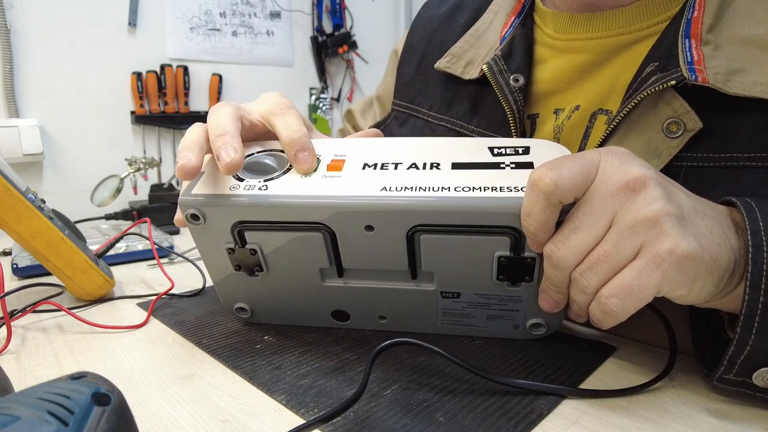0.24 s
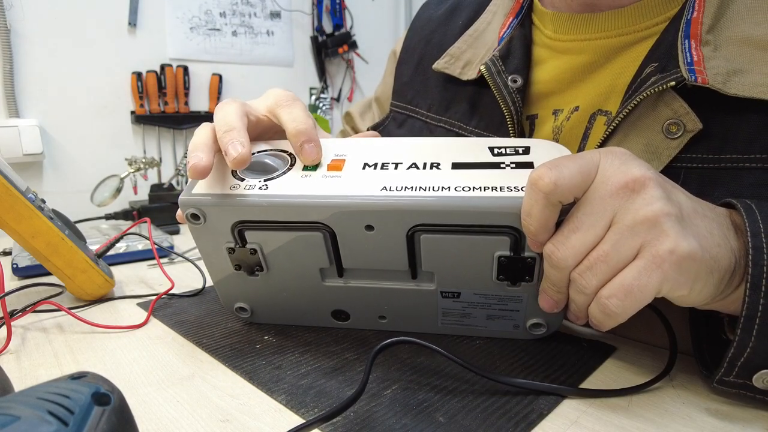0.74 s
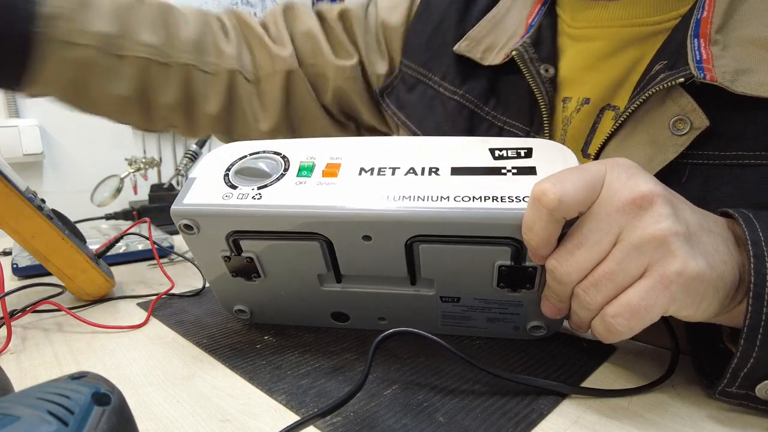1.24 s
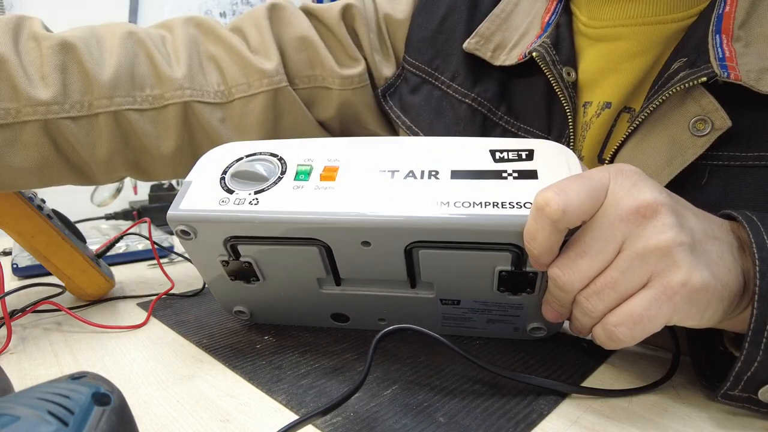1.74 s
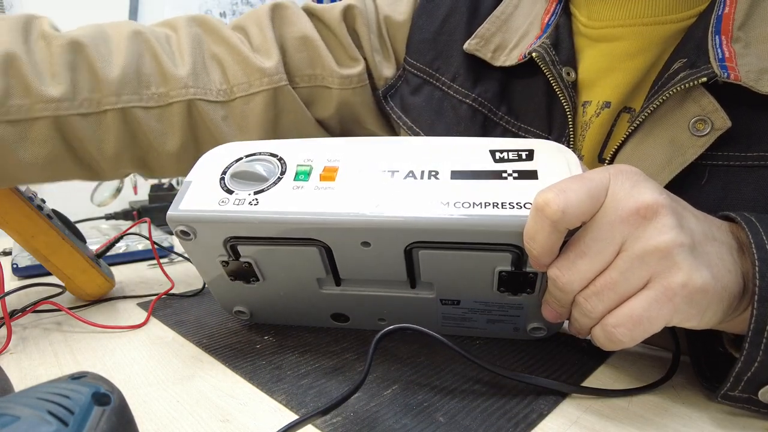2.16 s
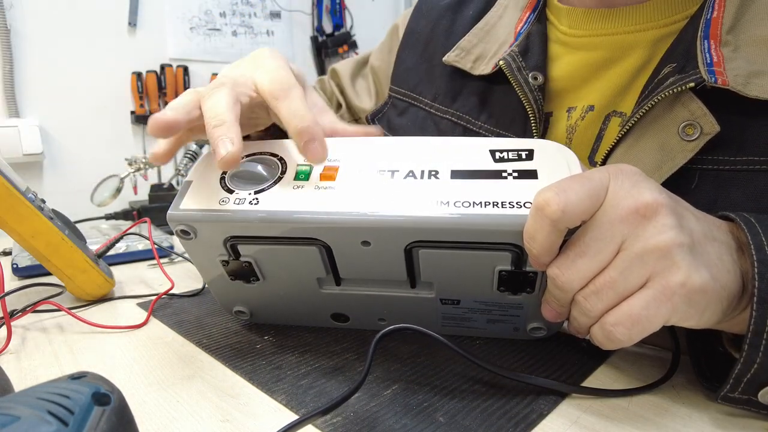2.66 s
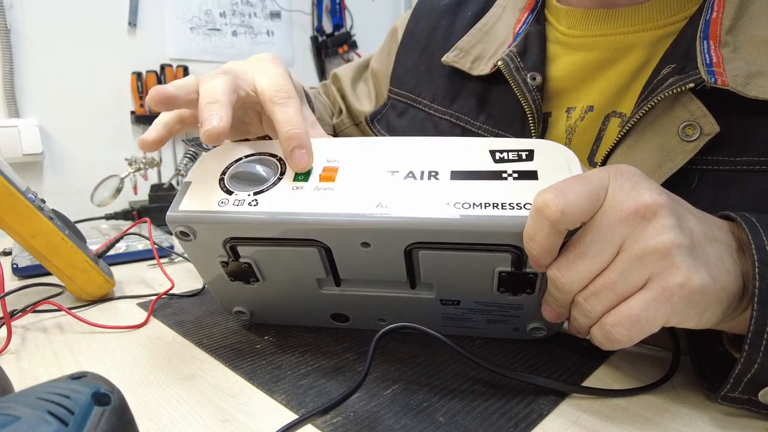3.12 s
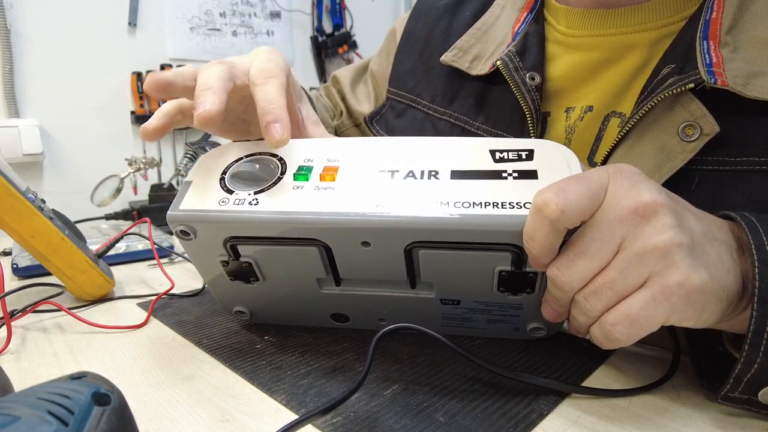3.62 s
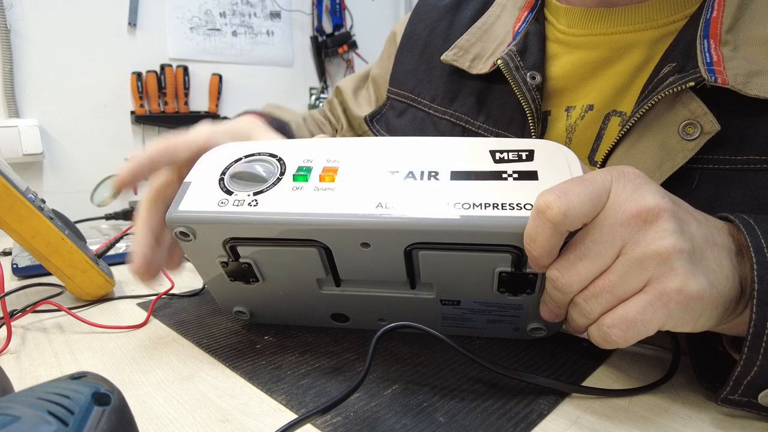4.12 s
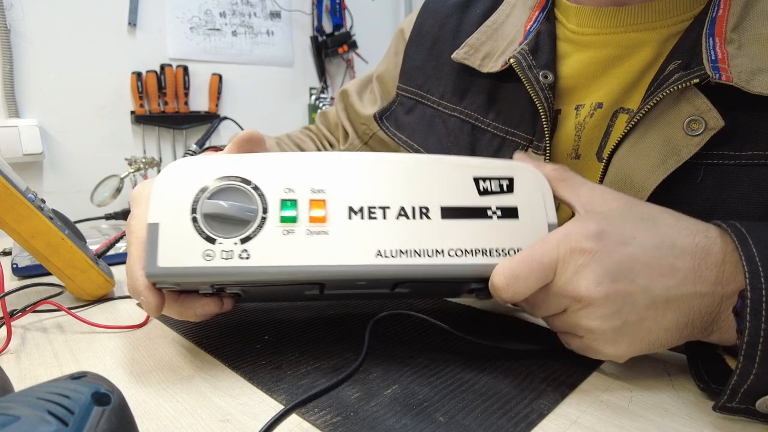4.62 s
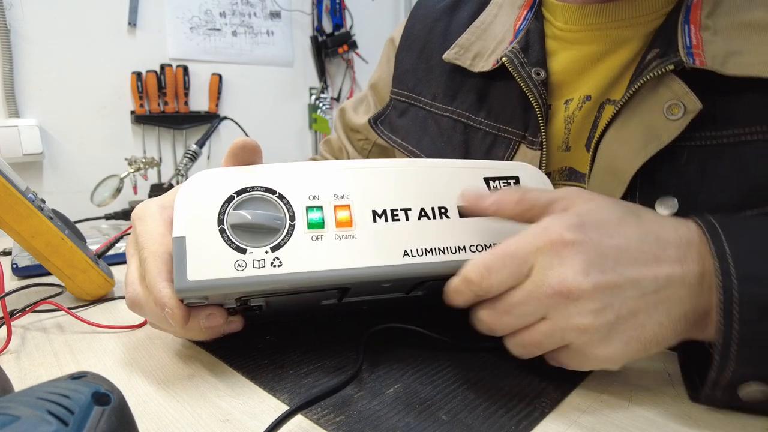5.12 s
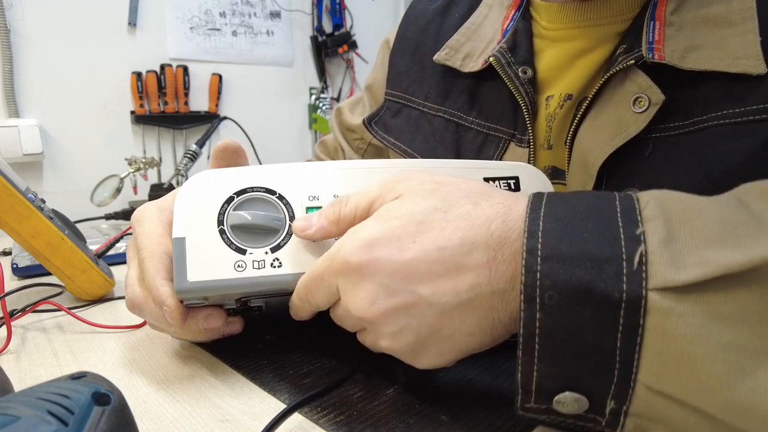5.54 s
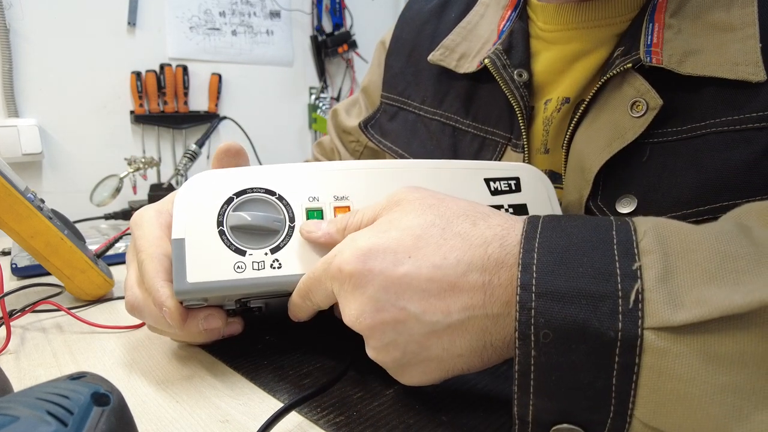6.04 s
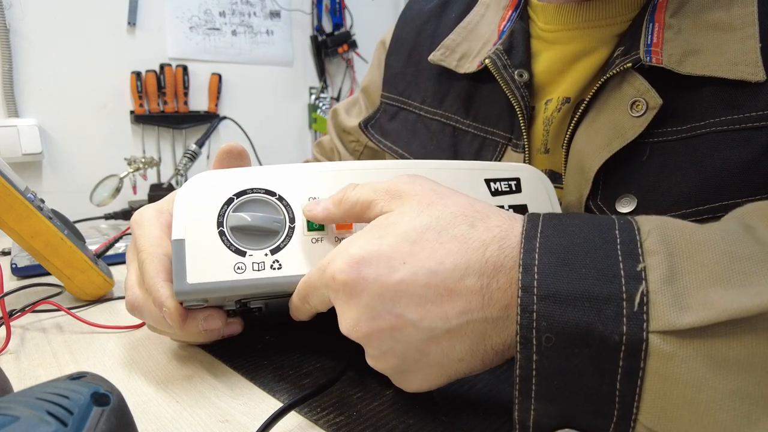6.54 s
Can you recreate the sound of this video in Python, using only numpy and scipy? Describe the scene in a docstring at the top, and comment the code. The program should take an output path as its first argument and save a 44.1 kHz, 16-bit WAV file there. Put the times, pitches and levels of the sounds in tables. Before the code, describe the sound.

In a small, fairly dry workshop, hands click and brush around a pump over a soft rumble. After about three seconds a switch starts a steady fast mains buzz with bright air hiss. Turning the case shifts the hiss and resonance; a thud lands on the bench. A sharp snap silences it, leaving a thin fading seep, then another snap restarts it. Close microphones.

```python
"""Diaphragm air pump on a workbench

A small mains-driven pump in a hard case, close to two capsules: harmonics of the mains make the hum,
and one gust of noise a cycle drives the resonances of valve, outlet and shell.
Hands click and rustle (shaped noise) in a droning workshop; the rocker snaps on, the pump is tipped
towards the microphone and set down, is switched off and on again; the bench knocks and wobbles (decaying sines).
"""
import sys
import numpy as np
from scipy import signal
from scipy.fft import rfft, irfft
from scipy.io import wavfile
from scipy.ndimage import uniform_filter1d

SR = 44100
rng = np.random.default_rng(int(sys.argv[2]) if len(sys.argv) > 2 else 0)


def put_to_file(sound):
    """Save the sound as 16-bit audio at rate SR, in the file named by the first command-line argument."""
    columns = np.atleast_2d(sound).T  # one column per channel
    safe = np.clip(columns, -1, 1)
    whole_steps = np.round(safe * 32767)
    wavfile.write(sys.argv[1], SR, whole_steps.astype(np.int16))


N = 298998

# Pump running. Each row: on in seconds, off in seconds.
RUNS_S = [(3.3, 6.06), (6.68, 7.0)]
# Magnet hum. Each row: multiple of mains, level in dB.
HUM = [(1, -40), (2, -48.5), (3, -40), (4, -65), (5, -57), (6, -68)]
# Air hiss, base or front towards the microphone. Each row: frequency in Hz, relative density in dB.
HISS_BASE = [(210, -43), (350, -7), (411, -17), (577, -31), (625, -5.5), (1330, -9.5), (1590, -20),
             (3400, -8), (3990, -11.5), (5170, -15), (6370, -2), (7370, -5), (11800, -10.5), (15200, -10.5),
             (16500, -45)]
HISS_FRONT = [(210, -51), (350, -21), (453, -15), (568, -20), (850, -9), (1310, -7.5), (1700, -3),
              (2460, -36), (3630, -23), (4120, -7.5), (4470, -10.5), (7860, -6.5), (11600, -24),
              (15200, -15.5), (16500, -52)]
# Resonances of outlet, valve and shell. Each row: frequency in Hz, width in Hz, relative level in dB.
OUTLET = [(1696, 210, 3), (1808, 204, -2.5), (1980, 110, -8), (1556, 180, -3.5), (1370, 150, -11)]
VALVE_BASE = [(5620, 220, -3), (6190, 300, 0), (6470, 300, -2), (6850, 400, -6), (7930, 300, -6),
              (8560, 250, -10)]
VALVE_FRONT = [(5600, 400, -6), (6350, 400, -1), (6800, 350, -5), (7270, 300, -3), (7750, 300, 0),
               (8000, 250, -1), (8600, 250, -6)]
SHELL_BASE = [(1510, 680, -5.5), (2060, 220, -3), (2630, 170, 0.5), (3480, 390, -6), (4000, 280, -1),
              (4720, 340, -2.5)]
SHELL_EDGE = [(2320, 310, -9.5), (3720, 130, -1), (4000, 650, 0), (4830, 180, -10.5), (7950, 450, 2),
              (8920, 480, -1.5)]
SHELL_FRONT = [(845, 200, 0.5), (1252, 63, 3.5), (2690, 240, -1), (3230, 170, 2), (3440, 470, -2.5),
               (4300, 290, -14), (4910, 170, -1)]
# Tipping of the case. Each row: time in seconds, tilt in degrees (0 base-on, 90 front-on).
TILT = [(3.3, 15.7), (4.2, 10.4), (4.32, 18), (4.46, 27.6), (4.6, 62.3), (4.8, 64.2), (4.95, 66),
        (5.7, 66.4), (5.95, 110), (6.78, 90)]
# What arrives at each tilt. Each row: tilt in degrees, then shell, outlet, valve and hiss,
# all in dB before the run-time and side gains.
FACING = [(13.7, -47, -55, -40, -52.5), (23.9, -42, -41.5, -51.5, -56.5), (44.7, -43, -44, -60, -54.5),
          (61.9, -39, -45, -57, -56), (65.8, -43.5, -40.5, -42, -49.5), (90, -51.5, -40, -42, -48.5)]
# Gap between case and bench, sings higher as it closes: start in seconds, length in seconds,
# from Hz, to Hz, level in dB.
GAP = (4.5, .8, 2650, 3300, -50.5)
# Handling clicks and rocker snaps. Each row: start in seconds, level in dB, loudest at Hz,
# fall either side in dB per octave, t60 in seconds of a band from 1500 Hz, tick in dB re the burst.
CLICKS = [(0.175, -51, 5500, 9, 0.05, -12), (0.185, -31, 1800, 3.5, 0.077, -16),
          (1.316, -24.5, 1880, 14, 0.043, -9), (1.595, -33.5, 690, 6, 0.13, -22),
          (1.604, -51, 2000, 2.5, 0.081, -20), (1.721, -52, 13000, 12, 0.055, -25),
          (1.743, -49.5, 4000, 8, 0.04, -20), (1.808, -45, 1250, 10, 0.04, -18),
          (1.941, -30.5, 1630, 10.5, 0.068, -19), (1.9965, -27.5, 12900, 10, 0.047, -30),
          (1.9975, -24, 2480, 11, 0.058, -28), (2.039, -27, 1080, 9, 0.06, -20),
          (2.118, -52, 5000, 8, 0.04, -8), (2.345, -53, 5000, 12, 0.035, 14),
          (2.591, -62, 9000, 5, 0.05, -5), (3.289, -56, 6000, 9, 0.03, -15)]
SNAPS = [(3.2986, -27, 1400, 2.2, 0.031, 2), (6.0930, -18.5, 3800, 4.8, 0.046, 17),
         (6.686, -22, 1790, 1.56, 0.024, -5)]
# Bands of a hit. Each row: lower edge in Hz, upper edge in Hz.
HIT_BANDS_HZ = [(90, 250), (250, 700), (700, 2000), (2000, 4500), (4500, 10000), (10000, 16000)]
# Case modes. Each row: frequency in Hz, relative level in dB, t60 in seconds.
CASE_MODES = [(336, -2, 0.035), (420, -7, 0.05), (997, -6.5, 0.038), (1292, -10, 0.072),
              (2700, -6.5, 0.036), (4610, 7, 0.008)]
# Sleeves and skin brushing past. Each row: start in seconds, length in seconds, treble level in dB,
# dull share in dB re the treble.
RUSTLE = [(1.0, 0.95, -73, 3.5), (1.8, 1.0, -77.5, 0.1), (6.0, 0.83, -80.5, 7.5)]
# Treble of the rustle. Each row: frequency in Hz, relative density in dB.
RUSTLE_TONE = [(1500, -30), (3000, -1), (6000, 0), (9000, -3), (10800, -1), (12500, -5), (15500, -6)]
# Finger sliding on the panel: start in seconds, level in dB.
SQUEAK = (0.733, -63)
# Rocker creaking under the thumb. Each row: frequency in Hz, width in Hz, relative level in dB.
CREAK = [(1040, 350, 0)]
# Bench wobbles. Each row: start in seconds, frequency in Hz, level in dB, rise constant in seconds, t60 in seconds.
WOBBLES = [(0.752, 28.5, -9.5, 0.043, 0.62), (1.02, 28.4, -24, 0.054, 0.84),
           (4.755, 37.9, -17, 0.017, 0.46), (4.7595, 70, -12.5, 0.00092, 0.15)]
# Dull knocks of case and tools on the bench. Each row: start in seconds, level in dB, loudest at Hz.
KNOCKS = [(1.318, -36, 1060), (1.597, -30.5, 504), (1.806, -39.5, 1300), (1.943, -45, 1300),
          (2.042, -32, 1210), (2.046, -35.5, 450), (4.761, -26, 695), (6.687, -32.5, 400)]
# Bench-top modes. Each row: frequency in Hz, relative level in dB, t60 in seconds.
WOOD_MODES = [(411, 2.3, 0.078), (636, -5, 0.056), (724, 2.5, 0.032), (862, -3, 0.062), (1287, 1, 0.045)]
# Broad workshop noise. Each row: frequency in Hz, relative density in dB.
SHOP = [(24, -29), (40, 2), (106, -1.5), (185, -1.5), (237, -15), (269, -7), (372, -16.5), (412, -11.5),
        (479, -15), (630, -18.5), (715, -31.5), (852, -23.5), (1760, -27), (2320, -33.5), (16000, -72.5)]
# Wavering drone bands. Each row: frequency in Hz, width in Hz, level in dB.
DRONE = [(136.5, 5.4, -52.5), (290, 19.6, -60), (419, 92, -62), (1426, 150, -67.5), (1720, 210, -68.5)]
# The two capsules. Each row: frequency in Hz, likeness 0-1, lead of the left in radians.
ALIKE = [(60, 0.97, .05), (152, 0.99, .1), (309, 0.91, 0.56), (700, 0.07, 1.97), (1720, 0.86, 0.59),
         (3240, 0.31, 1.24), (6950, 0.78, 1.76), (13000, 0.28, 2.35)]

MAINS_HZ = 50
STROKE_TURNS, HUM_PHASE_TURNS = 0.15, 0.33  # stroke within the mains cycle; phase added to each harmonic
PUFF_AT_TURNS, PUFF_RISE_TURNS, PUFF_HOLD_TURNS = 0.405, 0.21, 0.35  # valve opens, rise, hold
PUFF_FADE_DB_PER_TURN, LEAK_DB = -40.5, -20.5
STROKE_SCATTER_DB, PUFF_SCATTER_DB, OUTLET_SCATTER_DB = 0.9, 3.5, 2
SLAP_DB, SLAP_AT_TURNS, SLAP_JITTER_TURNS = -7, 0.1501, 0.0064  # re outlet air; after the opening; wander
# Pans: left over right.
PUMP_PAN_DB, BENCH_PAN_DB, CAPSULE_PAN_DB = 0.1, 2.0, 0.92
CLICK_RISE_S, CLICK_RING_DB, CLICK_PAN_DB = 0.00059, -19, 1
SNAP_RISE_S, SNAP_RING_DB, SNAP_PAN_DB = 0.0011, -14.5, 0.5
CASE_RISE_S = 0.0009
SQUEAK_RISE_S, SQUEAK_HOLD_S, SQUEAK_T60_S = 0.0096, 0.047, 0.17
SEEP_DB, SEEP_RISE_S, SEEP_FADE_DB_PER_S = -71, 0.086, -12
CREAK_S, CREAK_DB = 0.027, -47
RUMBLE_DB, RUMBLE_SWAY_DB = -49.5, 3.5
KNOCK_RISE_S, KNOCK_FALL_DB_PER_OCTAVE = 0.0022, 11
SHOP_DB, SHOP_SWAY_DB, DRONE_SWAY_DB = -43.5, 0.37, 2.5
ROOM_T60_S, ROOM_DB = 0.17, -14.5
TOP_HZ = 16200


def pump():
    """Magnet hum, and one puff of air through valve, outlet and shell in every mains cycle."""
    t = np.arange(N) / SR
    turns = MAINS_HZ * t
    cycle, share = np.divmod(turns - PUFF_AT_TURNS, 1)
    opened_s = cycle / MAINS_HZ
    live = sum((opened_s >= on) & (opened_s < off) for on, off in RUNS_S)
    # the armature builds up and settles
    swing = signal.lfilter([1 / (0.0075 * SR)], [1, 1 / (0.0083 * SR) - 1], live)
    hum = magnet_hum(turns, swing)
    flow = air_flow(cycle, share, live, swing)

    tilt = curve(TILT)[0]
    degrees, *levels = np.transpose(FACING)
    shell_db, outlet_db, valve_db, hiss_db = (np.interp(tilt, degrees, db) for db in levels)
    front = np.clip(tilt / 90, 0, 1)
    base = 1 - front
    edge = np.sin(np.pi * front) ** 2  # half way round, the edge of the case faces the microphone

    air, jet = pair(N) * flow, pair(N) * flow
    hiss = unit(colour(air, HISS_BASE)) * base * undb(8.5)
    hiss = hiss + unit(colour(air, HISS_FRONT)) * front * undb(8)
    valve = blown(VALVE_BASE, jet, cycle) * base + blown(VALVE_FRONT, jet, cycle) * front
    flat_shell = blown(SHELL_BASE, jet, cycle) * base + blown(SHELL_FRONT, jet, cycle) * front
    shell = flat_shell * (1 - edge) + blown(SHELL_EDGE, jet, cycle) * edge
    outlet_drive = unit(pair(N) * flow ** 1.7) + undb(SLAP_DB) * flap_slap(turns, live)
    outlet = blown(OUTLET, outlet_drive, cycle, OUTLET_SCATTER_DB)

    puffs = hiss * undb(hiss_db) + valve * undb(valve_db)
    puffs = puffs + outlet * undb(outlet_db) + shell * undb(shell_db) + gap_whistle(jet)
    return hum, panned(puffs * np.sqrt(np.mean(live)), PUMP_PAN_DB)


def magnet_hum(turns, swing):
    """Mains harmonics, slightly unsteady, scaled by the armature's swing."""
    hum = 0
    for k, db in HUM:
        phase_turns = k * (turns - STROKE_TURNS) + HUM_PHASE_TURNS
        hum = hum + undb(db + 0.4 * walk(3)) * np.cos(2 * np.pi * phase_turns)
    return np.sqrt(2) * swing * hum


def air_flow(cycle, share, live, swing):
    """The valve opens, holds and fades each cycle over a steady leak; no two strokes alike."""
    opening = np.sin(np.pi / 2 * np.clip(share / PUFF_RISE_TURNS, 0, 1)) ** 2
    fade = undb(PUFF_FADE_DB_PER_TURN * (share - PUFF_HOLD_TURNS).clip(0))
    flow = live * opening * fade + swing * undb(LEAK_DB)
    return unit(flow * undb(STROKE_SCATTER_DB * per_cycle(cycle, 1)[0]))


def flap_slap(turns, live):
    """The valve flap slaps its seat: one impulse a cycle, wandering in time."""
    count = np.floor(turns - PUFF_AT_TURNS - SLAP_AT_TURNS + SLAP_JITTER_TURNS * walk(30))
    return unit(live * (np.diff(count, prepend=0) > 0))


def gap_whistle(jet):
    """Smoothed jet noise on a gliding carrier: a narrow band that rises as the gap closes."""
    start, length, from_hz, to_hz, db = GAP
    hz = np.interp(np.arange(N) / SR, [start, start + length], [from_hz, to_hz])
    carrier = np.cos(2 * np.pi * np.cumsum(hz) / SR)
    return unit(uniform_filter1d(jet, size=110)) * carrier * undb(db) * swell(start, length)


def blown(modes, drive, cycle, scatter_db=PUFF_SCATTER_DB):
    """Every puff catches each steep-sided resonance with a different strength."""
    out = 0
    for (hz, width, db), size in zip(modes, per_cycle(cycle, len(modes))):
        once = ring(drive * undb(scatter_db * size), [(hz, width, db)])
        out = out + ring(once, [(hz, width, 0)])
    return unit(out)


def per_cycle(cycle, count):
    """Random numbers, each held for one puff cycle."""
    draws = rng.standard_normal((N * MAINS_HZ // SR + 2, count))
    return draws[cycle.astype(int) + 1].T


def hits(rows, rise_s, ring_db, pan_db):
    """Each hit: a sharp tick, a burst of rattle that dies faster in the treble, and the ring of the case."""
    out, n = np.zeros((2, N + SR)), SR // 4
    t = np.arange(n) / SR
    case = sum(undb(db) * np.sin(2 * np.pi * hz * t) * decay(t, t60) for hz, db, t60 in CASE_MODES)
    case = case * attack(t, CASE_RISE_S)
    tick = np.sin(2 * np.pi * 4600 * t) * np.exp(-t / 0.0002)
    for start, level_db, top_hz, fall_db, t60, tick_db in rows:
        noise, burst = pair(n), 0
        for k, (lo, hi) in enumerate(HIT_BANDS_HZ):
            fade = attack(t, rise_s) * decay(t, t60 * (1500 / lo) ** 0.2)
            band = signal.butter(2, [lo, hi], "bandpass", fs=SR, output="sos")
            part = signal.sosfilt(band, noise * fade)
            band_db = -abs(fall_db * np.log2(np.sqrt(lo * hi) / top_hz))
            burst = burst + (-1) ** k * undb(band_db) * part / np.abs(part).max()
        hit = burst + undb(tick_db) * (tick + undb(ring_db) * case)
        i = int(start * SR)
        out[:, i:i + n] += panned(undb(level_db) * hit, pan_db)
    return out[:, :N]


def hands():
    """Friction noise of cloth, finger and rocker, plus the pump's seep at rest."""
    return rocker_creak() + cloth_rustle() + finger_squeak() + pressure_seep()


def rocker_creak():
    """Resonant noise swells under the thumb and is cut off by each snap."""
    t = np.arange(N) / SR
    press = sum(swell(s - CREAK_S, 2 * CREAK_S) * (t < s) for s, *_ in SNAPS)
    return unit(ring(pair(N), CREAK)) * undb(CREAK_DB) * press


def cloth_rustle():
    """Bright and dull noise, grainy in level, swells as cloth and skin brush past."""
    grain = undb(1.2 * walk(90) + 0.8 * walk(12))
    bright = unit(colour(pair(N), RUSTLE_TONE))
    dull = unit(ring(pair(N), [(3300, 1700, 0)]))
    cloth = 0
    for start, length, db, dull_db in RUSTLE:
        cloth = cloth + undb(db) * swell(start, length) * (bright + undb(dull_db) * dull)
    return cloth * grain


def finger_squeak():
    """Resonant friction noise: quick rise, short hold, decay."""
    start, db = SQUEAK
    modes = [(6050, 300, 0), (9000, 700, -6), (4300, 3000, -8), (12500, 4000, -15)]  # Hz, width Hz, dB
    since = np.arange(N) / SR - start
    slide = np.clip(since / SQUEAK_RISE_S, 0, 1) ** 2 * decay((since - SQUEAK_HOLD_S).clip(0), SQUEAK_T60_S)
    return unit(ring(pair(N), modes)) * slide * undb(db)


def pressure_seep():
    """Thin, fading whistle of left-over pressure while the pump rests: narrow-band noise."""
    t = np.arange(N) / SR
    rest = (t - RUNS_S[0][1]).clip(0) * (t < RUNS_S[1][0])
    level = attack(rest, SEEP_RISE_S) * undb(SEEP_DB + SEEP_FADE_DB_PER_S * rest)
    return unit(ring(pair(N), [(5250, 190, 0)])) * level


def bench():
    """Wobbles and knocks of the bench top when leant on or struck, over a restless rumble."""
    rumble = ring(ring(pair(N), [(29.4, 20, 0)]), [(29.5, 56, 0)])
    out = unit(rumble) * undb(RUMBLE_DB + RUMBLE_SWAY_DB * walk(4))
    out = out + sum(struck(*row) for row in WOBBLES)
    for start, level_db, top_hz in KNOCKS:
        for hz, db, t60 in WOOD_MODES:
            fall_db = KNOCK_FALL_DB_PER_OCTAVE * abs(np.log2(hz / top_hz))
            out = out + struck(start, hz, level_db + db - fall_db, KNOCK_RISE_S, t60)
    return panned(out, BENCH_PAN_DB)


def struck(start, hz, db, rise_s, t60):
    """One mode: a sine that rises quickly and dies away."""
    t = (np.arange(N) / SR - start).clip(0)
    return undb(db) * attack(t, rise_s) * decay(t, t60) * np.sin(2 * np.pi * hz * t)


def shop():
    """Workshop drone: broad noise with a few wavering bands."""
    out = unit(colour(pair(N), SHOP)) * undb(SHOP_DB + SHOP_SWAY_DB * walk(2.69))
    for hz, width, db in DRONE:
        out = out + unit(ring(pair(N), [(hz, width, 0)])) * undb(db + DRONE_SWAY_DB * walk(4.08))
    return out


def room(x):
    """Walls answer with a short decaying wash, different at each capsule."""
    t = np.arange(SR // 2) / SR
    tail = pair(len(t)) * decay(t, ROOM_T60_S) * (t > 0.004)
    tail = signal.lfilter([1], [1, -0.3], tail)  # duller
    wash = signal.fftconvolve(x, tail / np.linalg.norm(tail[0]), axes=1)[:, :N]
    return x + undb(ROOM_DB) * wash


def undb(db):
    """Decibels to amplitude."""
    return 10 ** (np.asarray(db) / 20)


def unit(x):
    """Scale to an rms of 1."""
    return x / np.sqrt(np.mean(x ** 2))


def attack(t, rise_s):
    """Smooth exponential onset."""
    return (1 - np.exp(-t / rise_s)) ** 2


def decay(t, t60):
    """Exponential fall of 60 dB in t60 seconds."""
    return 1000.0 ** (-t / t60)


def swell(start, length):
    """A smooth rise and fall, 0 to 1 to 0."""
    return np.sin(np.pi * np.clip((np.arange(N) / SR - start) / length, 0, 1)) ** 2


def walk(rate_hz):
    """Random levels held 1 / rate_hz and slewed twice; spread near 1."""
    k = int(SR / rate_hz)
    steps = np.repeat(rng.standard_normal(N // k + 1), k)
    return 1.55 * uniform_filter1d(uniform_filter1d(steps, k), k)[:N]


def curve(rows):
    """Columns of a table, joined by straight lines in time."""
    s, *columns = np.transpose(rows)
    return [np.interp(np.arange(N) / SR, s, c) for c in columns]


def along(table, n, axis=1):
    """A column of a table by Hz, read on a log axis at the bins of an n-point transform."""
    table = np.transpose(table)
    bins_hz = np.arange(n // 2 + 1) * SR / n
    return np.interp(np.log(bins_hz + 1), np.log(table[0]), table[axis])


def pair(n):
    """White noise at two capsules; likeness and phase vary with frequency."""
    alike = np.clip(along(ALIKE, n), 0, 0.995)
    left, other = rfft(rng.standard_normal((2, n)))
    shared = left * np.exp(-1j * along(ALIKE, n, axis=2))
    right = alike * shared + np.sqrt(1 - alike ** 2) * other
    return irfft([left, right], n)


def colour(x, table):
    """Shape a spectrum by a table of Hz and dB."""
    n = x.shape[-1]
    return irfft(rfft(x) * undb(along(table, n)), n)


def ring(x, modes):
    """Sum of two-pole resonances (Hz, width Hz, dB), neighbours in opposite sign."""
    out = 0
    for k, (hz, width, db) in enumerate(modes):
        b, a = signal.iirpeak(hz, hz / width, SR)
        out = out + (-1) ** k * undb(db) * signal.lfilter(b, a, x)
    return out


def panned(x, pan_db):
    """Raise left over right by pan_db."""
    return x * undb(np.array([pan_db, -pan_db]).reshape(2, -1) / 2)


def scene():
    """Puffs and hits excite the room; the other layers stay dry."""
    hum, puffs = pump()
    clicks = hits(CLICKS, CLICK_RISE_S, CLICK_RING_DB, CLICK_PAN_DB)
    snaps = hits(SNAPS, SNAP_RISE_S, SNAP_RING_DB, SNAP_PAN_DB)
    return room(puffs + clicks + snaps) + hum + bench() + hands() + shop()


def record(dry):
    """The left capsule is a little louder; a steep low-pass cuts the top."""
    low_pass = signal.ellip(10, 0.2, 80, TOP_HZ, fs=SR, output="sos")
    return signal.sosfilt(low_pass, panned(dry, CAPSULE_PAN_DB))


dry = scene()
out = record(dry)
put_to_file(out)
```